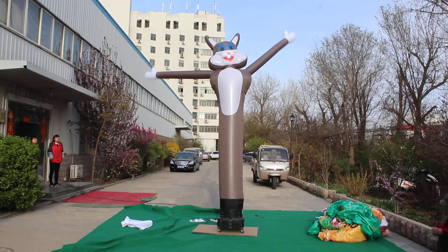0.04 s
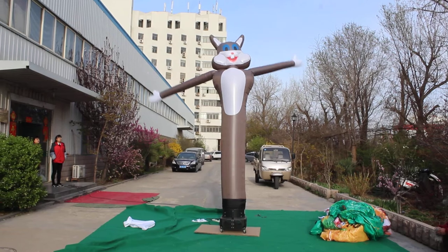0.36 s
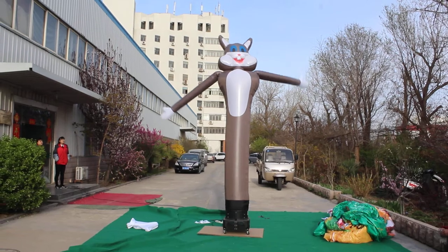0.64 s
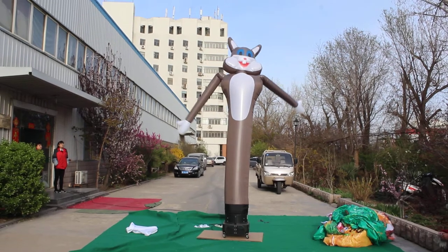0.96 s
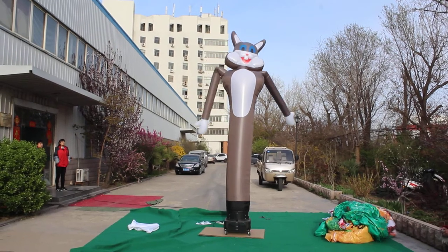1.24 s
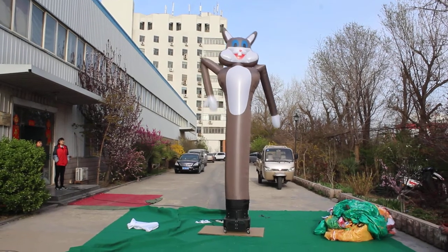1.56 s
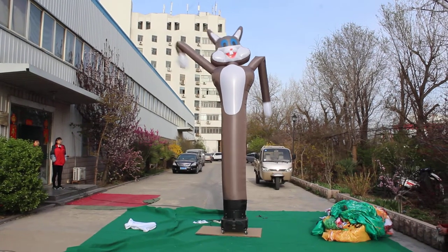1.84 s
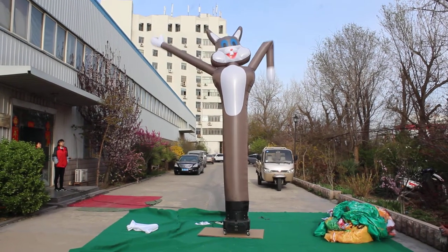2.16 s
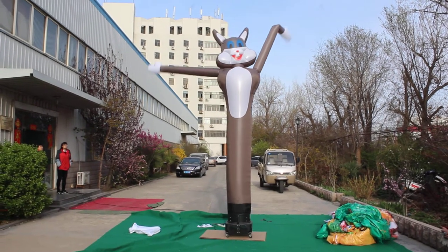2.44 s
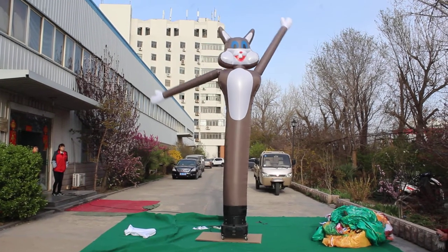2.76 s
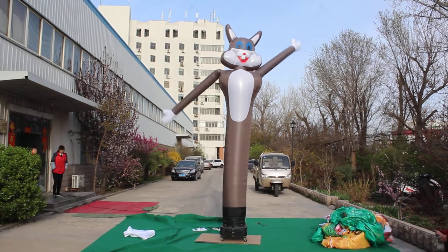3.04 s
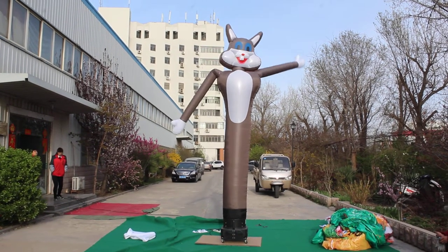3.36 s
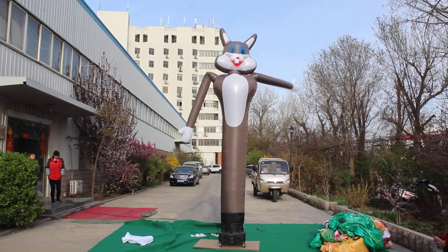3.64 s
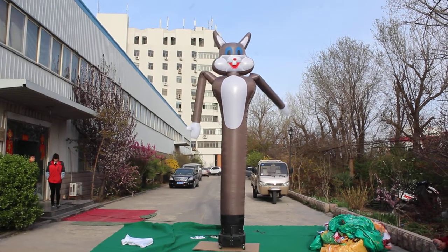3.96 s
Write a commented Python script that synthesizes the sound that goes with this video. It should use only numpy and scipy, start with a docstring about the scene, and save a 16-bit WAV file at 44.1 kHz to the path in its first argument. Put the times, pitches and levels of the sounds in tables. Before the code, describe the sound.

An electric blower is heard from the very start and runs steadily to the end, at about 4 seconds. Its loud, slightly fluttering rush of air blends with a low, gently wavering hum and a faint ring from the housing. The inflatable figure's nylon arms swish very faintly around 0.4 seconds and again from 1.6 to 2.4 seconds. Ground and walls outdoors add slight reflections.

```python
"""Blower and inflatable figure

An electric blower keeps an inflatable figure standing in a paved lane between buildings.
The fan blades hum at their passing rate over a loud, fluttering rush of air. The housing rings
faintly, ground and walls return both rush and ring, and the nylon arms rustle as they fold and fill."""
import sys
import numpy as np
from scipy import signal
from scipy.fft import rfft, irfft
from scipy.io import wavfile

SR = 44100
rng = np.random.default_rng(int(sys.argv[2]) if len(sys.argv) > 2 else 0)


def bounce(signal):
    """Save signal as a 16-bit WAV file at the path given by the first command-line argument."""
    frames = np.transpose(np.atleast_2d(signal))
    limited = np.clip(frames, -1, 1)
    pcm = np.round(limited * 32767).astype(np.int16)
    wavfile.write(sys.argv[1], SR, pcm)


N = 176400
TIME_S = np.arange(N) / SR
BIN_HZ = np.fft.rfftfreq(N, 1 / SR) + 1e-3  # offset avoids log(0)


def amp(db):
    """Decibels to gain."""
    return 10 ** (np.asarray(db) / 20)


def unit_rms(x):
    """Scale to rms 1."""
    return x / np.sqrt(np.mean(x ** 2) + 1e-20)


def noise(bin_gain):
    """Spectrally shaped noise, rms 1."""
    return unit_rms(irfft(rfft(rng.standard_normal(N)) * bin_gain, N))


def wander(top_hz):
    """Random motion up to about top_hz, rms 1."""
    return noise(BIN_HZ / (BIN_HZ + 1) / (1 + (BIN_HZ / top_hz) ** 4))


# Ground and wall reflections: delay/s, level/dB
LANE_ECHOES = [(.0135, -22), (0.03, -20.5), (.047, -23.5), (0.073, -21)]


def lane(steady):
    """Direct sound plus echoes from ground and walls."""
    return steady + sum(amp(db) * np.roll(steady, round(delay_s * SR)) for delay_s, db in LANE_ECHOES)


# Nylon rustles, Gaussian in time and log f: t/s, sigma/s, level/dB, f/Hz, sigma/oct
NYLON_RUSTLES = [(0.299, 0.098, -68, 7000, .35), (.397, .01, -53, 6200, .2), (1.68, .12, -61, 6500, 0.42),
                 (1.89, 0.051, -60, 7400, .26), (2.198, .14, -64, 7000, .42),
                 (2.383, 0.033, -66, 10300, .15)]


def nylon(crinkle_db=2):
    """Soft crinkling swishes as the arms fold and fill."""
    out = np.zeros(N)
    for peak_s, sigma_s, db, hz, sigma_oct in NYLON_RUSTLES:
        swish = noise(np.exp(-0.5 * (np.log2(BIN_HZ / hz) / sigma_oct) ** 2))
        crinkle = amp(crinkle_db * wander(top_hz=250))
        envelope = np.exp(-0.5 * ((TIME_S - peak_s) / sigma_s) ** 2)
        out += amp(db) * envelope * unit_rms(swish * crinkle)
    return out


# Casing and duct resonances: f/Hz, half-width/Hz, level/dB
HOUSING_MODES = [(180.3, 8, -33.5), (780, 10, -39.5), (1254, 11, -43), (1379, 14, -43.5)]


def housing():
    """Airflow keeps narrow resonances of the casing ringing."""
    return sum(amp(db) * noise(1 / (1 + ((BIN_HZ - hz) / half_width_hz) ** 2))
               for hz, half_width_hz, db in HOUSING_MODES)


# Air spectrum: f/Hz, relative density/dB
RUSH_SPECTRUM = [(15, -41.5), (32, -20.5), (72, -20), (90, -11), (115, -13), (132, -7), (175, -1),
                 (212, -4), (245, -2.0), (280, 0.5), (305, -10), (340, -5.5), (365, -4), (500, -2),
                 (590, -7), (720, -8.5), (775, -5), (840, -11), (1000, -12.5), (1380, -12.0), (1800, -18.5),
                 (1980, -25.5), (2100, -24), (2250, -15.5), (2370, -24), (2530, -19), (2660, -25.5),
                 (3200, -21.5), (3600, -22.0), (3880, -27.0), (4230, -26.6), (5110, -41), (5450, -39.0),
                 (6250, -46.5), (6650, -47.5), (8500, -56), (10300, -62), (15000, -76.3)]
# Slow swell of the rush: t/s, relative level/dB
RUSH_ENVELOPE = [(.1, 1), (.3, .8), (.8, 0.5), (1.02, 0.7), (1.2, -0.94), (1.65, 0.66), (2.4, 0),
                 (2.75, -0.1), (2.97, -1), (3.12, 0), (3.6, -0.26), (3.85, 0.5)]


def air_rush(blade_cycles, level_db=-19, flutter_db=0.5, eddy_db=1.33, chop_depth=0.18):
    """Turbulent air in fan and tube flutters; blades chop its midrange and eddies roughen it."""
    hz, density_db = np.transpose(RUSH_SPECTRUM)
    air = noise(amp(np.interp(np.log(BIN_HZ), np.log(hz), density_db)))
    low_hz, high_hz = 547, 1700
    bandpass = 1 / (1 + (low_hz / BIN_HZ) ** 8) / (1 + (BIN_HZ / high_hz) ** 8)
    midrange = irfft(rfft(air) * bandpass, N)
    chop = 1 + chop_depth * np.cos(2 * np.pi * blade_cycles)
    eddies = amp(eddy_db * wander(top_hz=170))
    rough_air = air + midrange * (unit_rms(chop * eddies) - 1)
    swell = amp(np.interp(TIME_S, *np.transpose(RUSH_ENVELOPE)))
    flutter = amp(flutter_db * wander(top_hz=14))
    return amp(level_db) * swell * flutter * rough_air


# Blade tones: harmonic number, level/dB, rms waver/dB
BLADE_HARMONICS = [(1, -19, 0.3), (2, -23.5, 1.5), (3, -32.5, 1), (4, -37.5, 0.5), (5, -45, 1)]
# Slow swell of the hum: t/s, relative level/dB
HUM_ENVELOPE = [(.1, -0.5), (.28, 3.2), (.4, -.3), (.7, .3), (1.2, -0.5), (1.6, -0.5), (1.75, 1),
                (2.0, -1.6), (2.3, -1.5), (2.699, 0.9), (3.1, 0), (3.4, -.3), (3.7, 0), (3.951, -0.5)]


def blade_hum(blade_cycles):
    """Harmonics of the blade passing rate, each wavering in the uneven inflow."""
    tones = np.zeros(N)
    for harmonic, db, waver_db in BLADE_HARMONICS:
        amplitude = np.sqrt(2) * amp(db + waver_db * wander(top_hz=9))
        tones += amplitude * np.cos(2 * np.pi * (harmonic * blade_cycles + rng.random()))
    swell = amp(np.interp(TIME_S, *np.transpose(HUM_ENVELOPE)))
    return swell * tones


def scene():
    """Mono mix; one drifting fan speed drives both hum and air chop."""
    blade_pass_hz, drift_rms = 223.63, 0.00096
    rate_hz = blade_pass_hz * (1 + drift_rms * wander(top_hz=1.8))
    blade_cycles = np.cumsum(rate_hz) / SR
    mix = blade_hum(blade_cycles) + lane(air_rush(blade_cycles) + housing()) + nylon()
    return mix[None]


def record(dry):
    """Abrupt onset, steep low-pass."""
    start_s, rise_s, cutoff_hz = 0.072, 0.0003, 15600
    gate = np.clip((TIME_S - start_s) / rise_s, 0, 1)
    lowpass = signal.firwin(511, cutoff_hz, window=("kaiser", 9), fs=SR)
    return signal.oaconvolve(dry * gate, lowpass[None], "same")


dry = scene()
out = record(dry)
bounce(out)
```